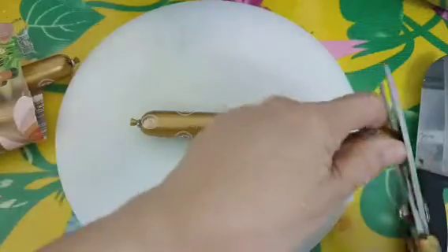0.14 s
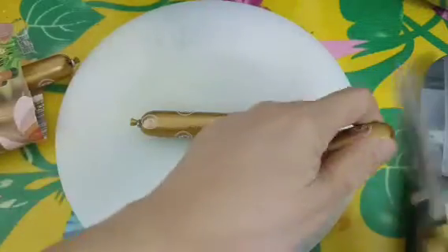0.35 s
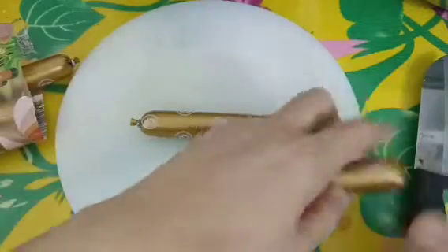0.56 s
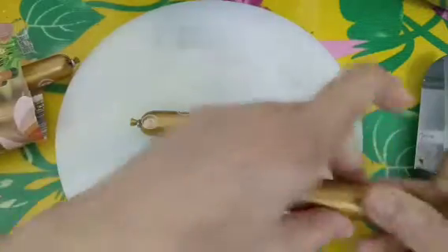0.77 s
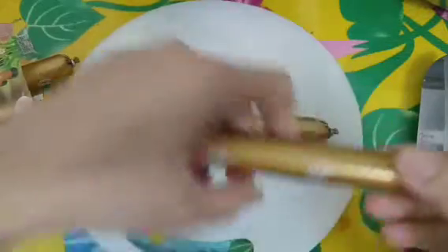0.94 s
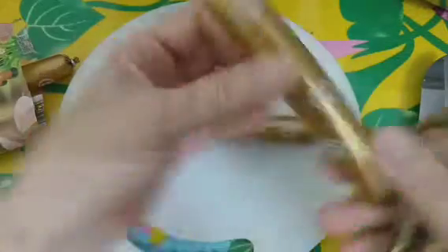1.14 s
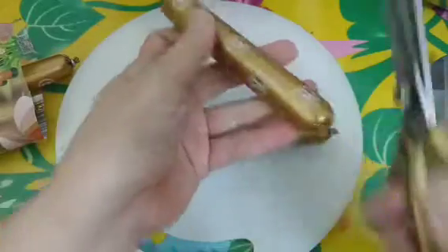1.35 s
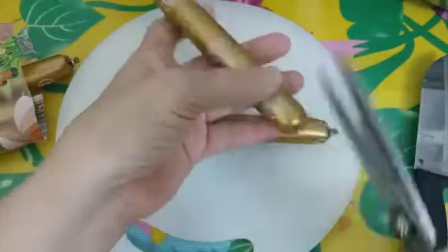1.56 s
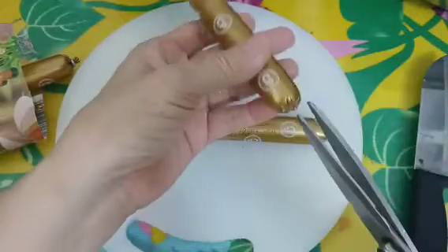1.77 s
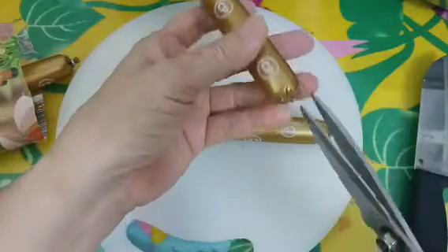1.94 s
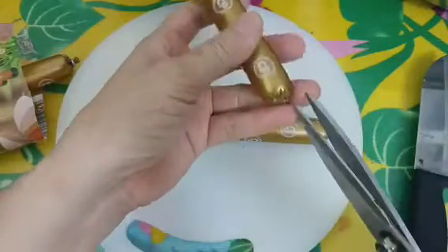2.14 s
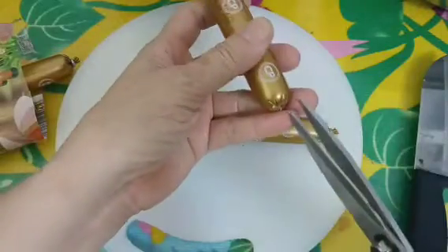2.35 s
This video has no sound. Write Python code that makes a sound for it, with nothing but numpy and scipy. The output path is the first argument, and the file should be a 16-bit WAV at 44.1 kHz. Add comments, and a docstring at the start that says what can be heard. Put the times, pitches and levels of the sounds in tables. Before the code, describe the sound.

Scissors cut a plastic sausage casing close by, with two quick cracks at about 0.2 and 0.3 seconds. The blades immediately snap shut, the loudest sound, ringing high for roughly half a second. A lighter clink comes at 1.25 seconds, then faint pivot ticks and handling knocks from 1.6 to 2.1. Low rumble, soft hiss and a faint appliance hum fill the small, slightly reverberant kitchen.

```python
"""Two quick cracks of plastic film, close by: scissors cut a sausage casing over a plate in a small kitchen.
The steel blades then snap shut, a broadband impact followed by the free vibration of their modes.
Later the scissors clink once, and the pivot ticks as they are opened again.
Near surfaces and the room reflect these sounds, over a low rumble, soft hiss and a faint appliance hum."""
import sys
import numpy as np
from scipy import signal
from scipy.fft import rfft, irfft
from scipy.io import wavfile

SR = 44100
rng = np.random.default_rng(int(sys.argv[2]) if len(sys.argv) > 2 else 0)


def transcribe(signal):
    """Save signal, clipped to [-1, 1], as a 16-bit WAV file at the path in sys.argv[1]."""
    frames = np.atleast_2d(signal).T
    limited = np.clip(frames, -1, 1)
    pcm = np.round(limited * 32767).astype(np.int16)
    wavfile.write(sys.argv[1], SR, pcm)


N = 105840

# The blades shut and rebound once: start_s, level_db, t60_s, tilt_db_per_octave
SNAP_IMPACTS = [(.3439, -9, 0.026, -1), (.3605, -24, .025, 9)]
SNAP_S = SNAP_IMPACTS[0][0]
# Spectra of the clack and of the steel shimmer: frequency_hz, relative_db
CLACK_SPECTRUM = [(300, -29), (850, -25.5), (1300, -30.5), (1950, -34), (2600, -25.5), (5800, -22),
                  (7000, -10.5), (7700, -7), (8600, 8), (10200, -3.5), (12000, -7), (15600, -18),
                  (16200, -44.5)]
SHIMMER_SPECTRUM = [(1000, -32.5), (2500, -22), (5000, -28), (6200, -40), (7600, -21), (8500, 0),
                    (10000, 4.5), (12000, -3.5), (15500, -10.5), (16000, -34.5)]
# Clear high modes and weaker low modes of the blades: pitch_hz, relative_db
HIGH_BLADE_MODES = [(7222, -20), (8587, -9), (8729, -8), (9304, -2), (9369, -6), (9778, -2), (9918, 0),
                    (10169, -9), (10388, -4), (10499, -1), (10982, -6), (11504, -1), (11710, -5),
                    (12118, -8), (12740, -6), (13036, -7), (13297, -10), (13693, -7), (14377, -6),
                    (14801, -11)]
LOW_BLADE_MODES = [(2326, 0.5), (2562, 0), (3424, -8.5), (4479, 3), (4560, -2), (4947, -4.5), (5604, -0.5),
                   (5992, -28.5), (6724, -3.5), (7574, -2.5)]
# Lightly damped blade modes: pitch_hz, level_db, t60_s
LASTING_MODES = [(859, -65, 6.9), (7222, -66, 0.78), (14379, -48, .6), (15700, -54.5, .55)]

# The film cracks when cut, crinkles when held: start_s, level_db, t60_s, tilt_db_per_octave, pan_db
FILM_CRACKS = [(0.1912, -34.5, 0.014, -5, -3.5), (.2080, -34, 0.035, -2, 2.5), (0.2117, -36.5, 0.01, 4, 5),
               (0.2107, -15, 0.0022, 1, 0.5), (0.2116, -24.5, 0.017, -3, -0.5), (0.2155, -25, .003, 9.5, 5),
               (0.2994, -30.5, 0.028, -1, -7.5), (0.3055, -37, .08, 0, 12.5),
               (1.817, -64.5, 0.047, -1.5, 0), (1.868, -64, .04, -5, 3)]
# Spectrum of a crack: frequency_hz, relative_db
CRACK_SPECTRUM = [(150, -18), (350, -6), (1000, -5), (1330, -13), (1750, -1), (2900, 0), (4500, -3),
                  (7500, -1), (8700, 5.5), (11500, 6.5), (13500, -3), (15500, 0), (16600, -21)]

# The moved scissors clink and bounce: start_s, level_db, t60_s, tilt_db_per_octave
CLINK_IMPACTS = [(1.2585, -28.5, 0.013, -0.1), (1.27, -43, 0.011, -1)]
# Steel modes excited by the clink: pitch_hz, level_db
CLINK_PARTIALS = [(3200, -52), (3560, -46.5), (7978, -43), (9290, -32), (10780, -39.5)]
# Ticks of the pivot: start_s, level_db, pan_db
PIVOT_TICKS = [(1.0877, -63.5, -2), (1.634, -47.5, 10), (1.6859, -49.5, 5), (1.757, -49.5, 9),
               (1.7945, -45.5, 8.5), (1.869, -58, 12), (1.873, -63, 16)]
# Spectra of a clink and of a tick: frequency_hz, relative_db
CLINK_SPECTRUM = [(500, -25), (1450, -12), (2300, -15), (2800, 1), (3600, -1), (4000, -0.5), (5400, -5.5),
                  (7000, -12.5), (8000, -5), (9300, 5.5), (10000, 0), (11300, -3), (12300, -21),
                  (15500, -20), (16500, -33)]
TICK_SPECTRUM = [(1000, -27.5), (4500, -13), (7000, -28.5), (9200, 2), (12000, -7), (15500, -10),
                 (16200, -30.5)]
# Knocks of casing, fingers and handles: start_s, pitch_hz, level_db, t60_s
HANDLING_KNOCKS = [(0.1913, 2450, -38, 0.0053), (0.2106, 397, -48, 0.013), (.2118, 990, -43, .008),
                   (.2118, 2630, -42, 0.014), (.3003, 1708, -42, .025), (.3005, 3020, -42, 0.047),
                   (.3442, 780, -39.5, .02), (0.3443, 1010, -42, 0.017), (1.689, 3500, -66, 0.027),
                   (1.7007, 3637, -56, 0.024), (1.809, 2090, -62, 0.044), (1.8195, 1560, -56, 0.045),
                   (1.848, 125, -46.5, 0.031), (2.056, 1723, -53.5, .014)]

# Reflections from near surfaces: delay_s, gain_db
REFLECTIONS = [(.0045, -23), (0.0091, -20.5), (0.0162, -18)]
# Reverberation time of the kitchen: frequency_hz, t60_s
REVERB_TIMES = [(200, 0.85), (1000, 0.94), (3000, 0.77), (8000, 0.51), (15000, 0.58)]
# Left level minus right level at the microphones: frequency_hz, pan_db
MIC_BALANCE = [(200, 2), (1000, -0.5), (2500, -4.5), (5000, -2), (9000, 1), (13000, -2)]

# Envelope of the rumble: time_s, gain_db
RUMBLE_ENVELOPE = [(0.0, -50.5), (0.11, -43.5), (0.29, -46.5), (0.33, -40.5), (0.711, -51), (1.069, -55),
                   (1.18, -60), (1.61, -49.5), (1.679, -55.5), (1.82, -49), (1.86, -68), (1.941, -49),
                   (2.08, -72.5), (2.11, -56), (2.149, -63.5), (2.24, -49.5), (2.279, -64), (2.4, -71)]
# Spectral densities of the rumble's noisy part and of the room noise: frequency_hz, relative_db
BOOM_SPECTRUM = [(60, -19.5), (110, 3.5), (170, -0.5), (280, -15.5), (500, -23.5), (1500, -34),
                 (5000, -55.5)]
FLOOR_SPECTRUM = [(15, -72), (25, -22), (47, -6), (70, 1), (165, -4.5), (205, -13.5), (299, -3.5),
                  (352, -14), (449, -14), (486, -17), (881, -21.5), (1150, -28.5), (2390, -32),
                  (3580, -35.5), (7220, -50), (9210, -40), (15800, -35)]
# Left-right likeness of the room noise: frequency_hz, correlation
FLOOR_CORRELATION = [(60, 1), (150, 0.99), (300, .82), (600, 0.14), (1500, 0.13), (10000, 0.1)]
# Tones of the appliance: pitch_hz, level_db
HUM_TONES = [(157, -66), (296, -72), (457.6, -71.5), (570.6, -88)]


def blade_snap(mode_count=200, shimmer_db=-19.5, shimmer_t60_s=0.18):
    """Impact excitation: the blades clack shut and set a dense shimmer of weak modes vibrating."""
    out, t = np.zeros((2, N)), np.arange(SR) / SR
    for start_s, db, t60, tilt_db in SNAP_IMPACTS:
        add(out, start_s, amp(db) * burst(CLACK_SPECTRUM, t60, tilt_db, correlation=0.044))
    shimmer = np.zeros((2, SR))
    for k, (place, decay, left, right) in enumerate(rng.random((mode_count, 4))):
        hz = 1000 + 15000 * ((k + place) / mode_count) ** .42  # crowded toward the treble
        t60 = shimmer_t60_s * np.exp(0.2 * (2 * decay - 1))
        envelope = amp(read(SHIMMER_SPECTRUM, hz) - 60 * t / t60)
        shimmer += envelope * np.sin(2 * np.pi * (hz * t + np.array([[left], [right]])))
    onset_rms = np.sqrt(np.mean(shimmer[:, :SR // 50] ** 2))
    add(out, SNAP_S, amp(shimmer_db) * shimmer / onset_rms)
    return out


def blade_ring():
    """Free vibration: after the snap the steel rings on, longest in its least damped modes."""
    out = np.zeros((2, N))
    add(out, SNAP_S, amp(-24.5) * chord(HIGH_BLADE_MODES, t60=0.42))
    add(out, SNAP_S, amp(-57) * chord(LOW_BLADE_MODES, t60=0.54))
    for hz, db, t60 in LASTING_MODES:
        add(out, SNAP_S, amp(db) * mode(hz, t60, spread_rad=0.5045))
    return out


def casing_cracks():
    """Sudden release of stress: the film gives way in short broadband bursts."""
    out = np.zeros((2, N))
    for start_s, db, t60, tilt_db, pan_db in FILM_CRACKS:
        add(out, start_s, amp(db) * pan(pan_db) * burst(CRACK_SPECTRUM, t60, tilt_db, correlation=0.23))
    return out


def scissor_clink():
    """Damped impact: the hand absorbs the steel's vibration, leaving a faint after-ring."""
    out = np.zeros((2, N))
    for start_s, db, t60, tilt_db in CLINK_IMPACTS:
        add(out, start_s, amp(db) * burst(CLINK_SPECTRUM, t60, tilt_db, correlation=0.19))
    for hz, db in CLINK_PARTIALS:
        ring = mode(hz, t60=0.024) + amp(-28) * mode(hz, t60=0.32)
        add(out, CLINK_IMPACTS[0][0], amp(db) * ring)
    return out * pan(db=-3.5)


def pivot_ticks():
    """Impulsive excitation: the pivot gives brief, bright ticks as the blades open."""
    out = np.zeros((2, N))
    for start_s, db, pan_db in PIVOT_TICKS:
        add(out, start_s, amp(db) * pan(pan_db) * burst(TICK_SPECTRUM, t60=0.0073))
    return out


def handling_knocks(relative_bandwidth=0.19):
    """Resonance: each knock excites one broad peak, formed by filtering a noise pulse twice."""
    out, t = np.zeros((2, N)), np.arange(SR // 2) / SR
    for start_s, hz, db, t60 in HANDLING_KNOCKS:
        pulse = noise_pair(correlation=0.56, size=len(t)) * amp(-60 * t / t60)
        b, a = signal.iirpeak(hz, 1 / relative_bandwidth, SR)
        knock = signal.lfilter(b, a, signal.lfilter(b, a, pulse))
        add(out, start_s, amp(db) * np.sqrt(2) * knock / abs(knock).max())
    return out


def kitchen_reverb(x, build_up_s=0.0032):
    """Diffuse reverberation: in a small hard room each band decays exponentially at its own rate."""
    hz, t, bands = signal.stft(rng.standard_normal((2, SR)), SR, nperseg=256)
    decay = amp(-60 * t / read(REVERB_TIMES, hz)[:, None])
    _, tail = signal.istft(bands * decay, SR, nperseg=256)
    tail *= np.minimum(np.arange(tail.shape[1]) / SR / build_up_s, 1)
    return signal.fftconvolve(x, tail / np.linalg.norm(tail[0]), axes=1)[:, :N]


def low_rumble():
    """Amplitude modulation: a deep tone and low noise swell and fade under one envelope."""
    boom_gain = amp(read(BOOM_SPECTRUM, np.fft.rfftfreq(N, 1 / SR)))
    boom = unit(irfft(rfft(noise_pair(correlation=0.837, size=N)) * boom_gain, N))
    swell = amp(np.interp(np.arange(N) / SR, *np.transpose(RUMBLE_ENVELOPE)))
    return swell * (amp(-3) * drone(hz=67.2, width_hz=7) + amp(-8.5) * boom)


def room_noise(cutoff_hz=15850):
    """Spatial coherence: the steady noise is alike on both sides in the bass, unlike in the treble."""
    hz = np.fft.rfftfreq(N, 1 / SR)
    white = rfft(rng.standard_normal((2, N)))
    spectra = correlate(*white, read(FLOOR_CORRELATION, hz))
    gain = amp(read(FLOOR_SPECTRUM, hz)) / np.sqrt(1 + (hz / cutoff_hz) ** 200)
    return amp(-55) * unit(irfft(spectra * gain, N)) * pan(db=-4)


def appliance_hum():
    """Sustained vibration: an appliance radiates a few faint, slowly wavering tones."""
    return sum(amp(db) * drone(hz, width_hz=0.67, waver=0.54) for hz, db in HUM_TONES)


def amp(db):
    """Amplitude ratio of a level in decibels."""
    return 10 ** (np.asarray(db) / 20)


def unit(x):
    """Normalisation to an rms of 1."""
    return x / np.sqrt(np.mean(x ** 2) + 1e-20)


def read(points, hz):
    """Interpolation of a table on a log-frequency axis."""
    frequencies, values = np.transpose(points)
    return np.interp(np.log(hz + 1), np.log(frequencies + 1), values)


def add(mix, start_s, sound):
    """Superposition of a sound on the stereo mix from start_s onward."""
    part = mix[:, round(start_s * SR):][:, :sound.shape[-1]]
    part += sound[..., :part.shape[1]]


def pan(db):
    """Stereo gains for a level difference, left minus right."""
    return amp([[db / 2], [-db / 2]])


def correlate(a, b, correlation):
    """Partial coherence: the right channel shares part of the left channel's noise."""
    return np.array([a, correlation * a + np.sqrt(1 - correlation ** 2) * b])


def noise_pair(correlation, size):
    """Two partially coherent white noises."""
    return correlate(*rng.standard_normal((2, size)), correlation)


def burst(spectrum, t60, tilt_db=0, correlation=0.31):
    """Source and filter: decaying noise is coloured at minimum phase, which keeps its onset sharp."""
    t, hz = np.arange(SR) / SR, abs(np.fft.fftfreq(2048, 1 / SR))
    gain = unit(amp(read(spectrum, hz) + tilt_db * np.log2((hz + 500) / 5000)))
    log_response = np.conj(signal.hilbert(np.log(gain + 1e-5)))
    taps = np.fft.ifft(np.exp(log_response)).real
    excitation = noise_pair(correlation, SR) * amp(-60 * t / t60)
    return signal.fftconvolve(excitation, taps[None, :1024], axes=1)


def mode(hz, t60, spread_rad=1.):
    """Damped harmonic oscillation, reaching the two microphones in different phases."""
    t = np.arange(N) / SR
    phase = spread_rad * rng.uniform(-0.86, 1) * np.array([[1], [-1]])
    attack = np.minimum(t * hz / 2, 1)  # two cycles
    return np.sqrt(2) * np.sin(2 * np.pi * hz * t + phase) * amp(-60 * t / t60) * attack


def chord(modes, t60):
    """Modal superposition, scaled to a starting rms near 1."""
    ring = sum(amp(db) * mode(hz, t60, spread_rad=0.32) for hz, db in modes)
    return ring / np.linalg.norm(amp([db for _, db in modes]))


def drone(hz, width_hz, waver=0):
    """Random modulation: a tone drifts in phase and may waver in level."""
    lowpass = np.exp(-(np.fft.fftfreq(N, 1 / SR) / width_hz) ** 2)
    drift = unit(np.fft.ifft(np.fft.fft(rng.standard_normal(N)) * lowpass).real)
    phase = 2 * np.pi * hz * np.arange(N) / SR + 0.58 * drift[::-1]
    return unit((1 + waver * drift) * np.sin(phase))


def microphones(x):
    """Level difference: the two microphones receive each band with unequal strength."""
    pan_db = read(MIC_BALANCE, np.fft.rfftfreq(N, 1 / SR))
    return irfft(rfft(x) * amp(np.outer([.5, -.5], pan_db)), N)


def scene():
    """Superposition of direct sound, reverberation, early reflections and background."""
    small_sounds = casing_cracks() + pivot_ticks() + handling_knocks()
    snap, clink = blade_snap(), scissor_clink()
    out = small_sounds + snap + clink + blade_ring()
    out += kitchen_reverb(amp(-11) * small_sounds + amp(-7) * snap + amp(-12.5) * clink)
    reflected = (snap + amp(2) * (small_sounds + clink))[::-1]  # left and right exchanged
    for delay_s, db in REFLECTIONS:
        add(out, delay_s, amp(db) * reflected)
    return microphones(out) + room_noise() + low_rumble() + appliance_hum()


def record(dry, ceiling=0.52, cutoff_hz=16500):
    """Saturation and band limiting: the snap's first instant overloads the input; a low-pass follows."""
    saturated = dry / (1 + (dry / ceiling) ** 6) ** (1 / 6)
    lowpass = signal.firwin(511, cutoff_hz, window=("kaiser", 9), fs=SR)
    return signal.oaconvolve(saturated, lowpass[None], "same")


dry = scene()
out = record(dry)
transcribe(out)
```